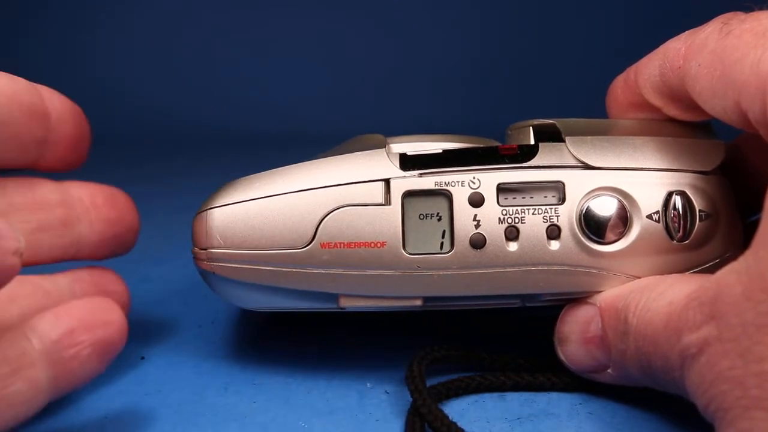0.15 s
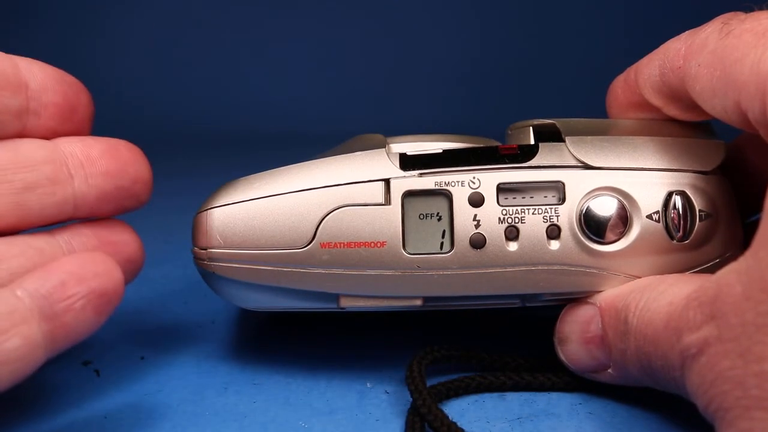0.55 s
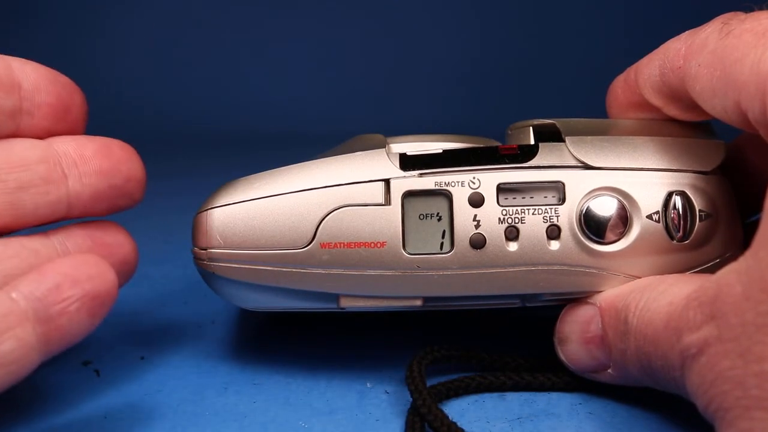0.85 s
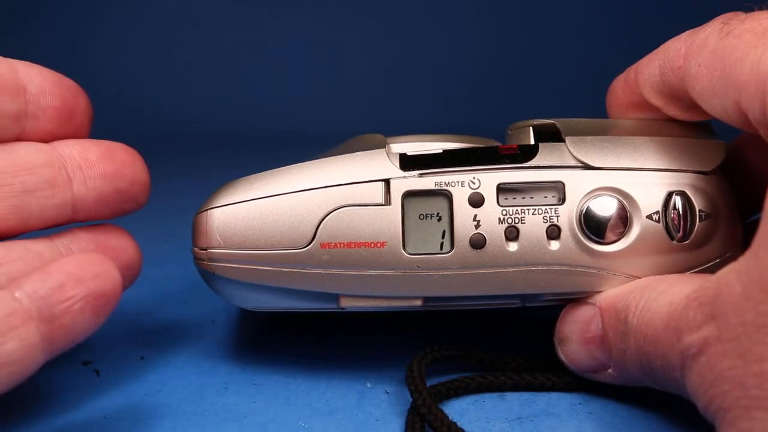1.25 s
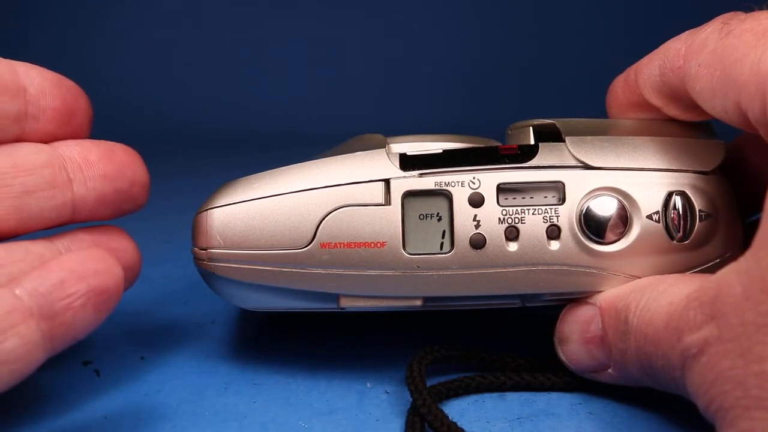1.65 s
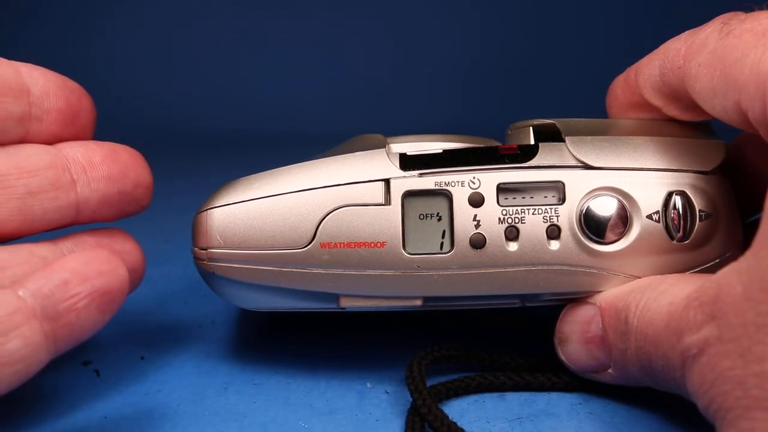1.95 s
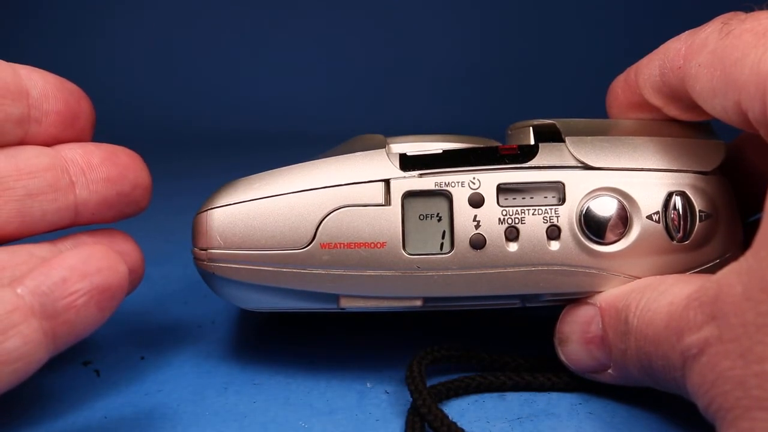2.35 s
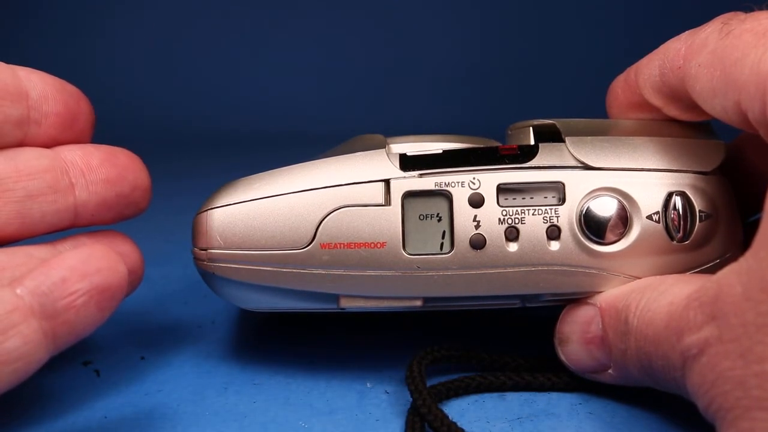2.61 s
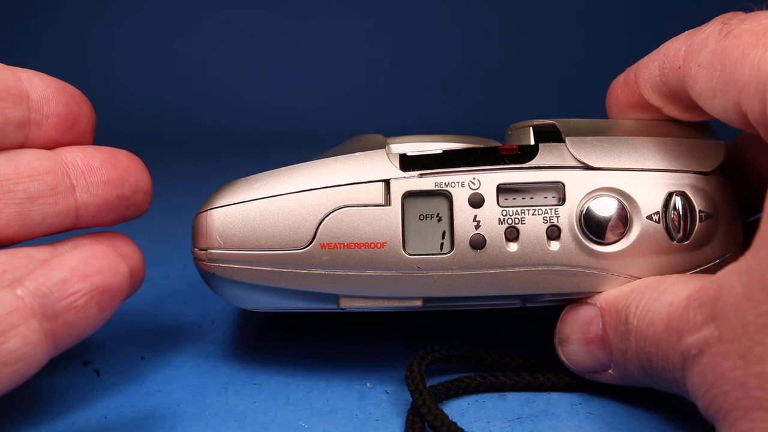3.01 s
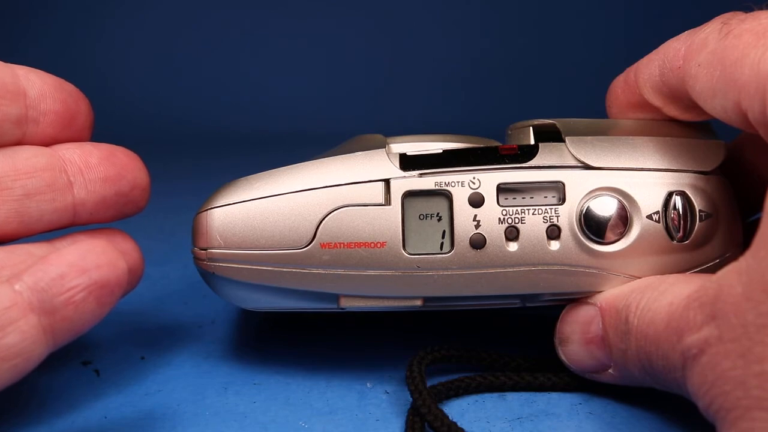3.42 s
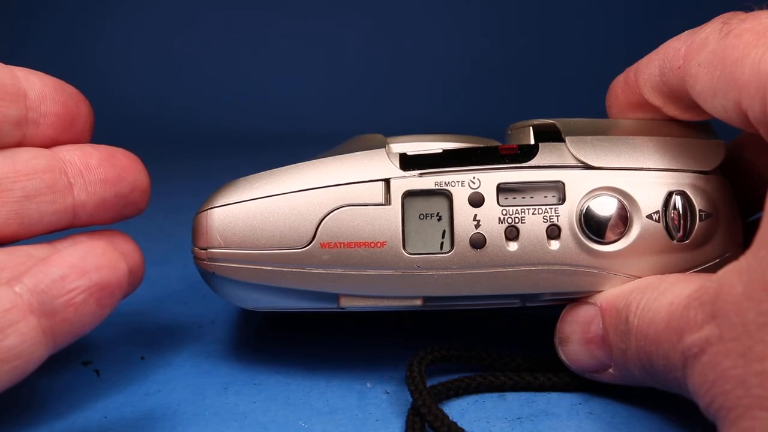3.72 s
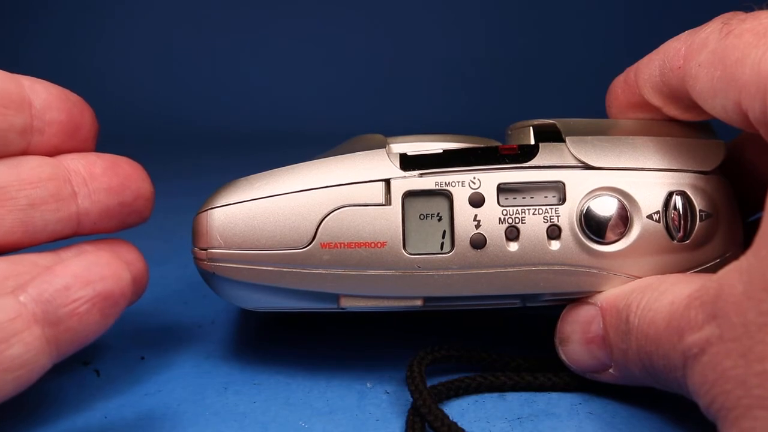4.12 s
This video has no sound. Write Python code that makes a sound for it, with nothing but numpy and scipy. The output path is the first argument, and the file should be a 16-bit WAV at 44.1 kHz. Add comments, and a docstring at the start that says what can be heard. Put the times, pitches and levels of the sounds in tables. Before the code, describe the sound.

Close, continuous electric whirring of a compact film camera rewinding, with a nasal whine, dry gear chatter and a faint click halfway through.

```python
"""Camera winding back its film

A small camera winds its film back, held close to a pair of microphones in a quiet room.
The three-pole motor is a sum of sines on its shaft orders, with the ten-tooth pinion's whine on the
mesh rate. The plastic gear train is noise and random tooth knocks coloured by the case, plus harder
knocks, a dull bump and one snap as ringing modes. A faint steady mains hum lies behind."""
import sys
import numpy as np
from scipy import signal
from scipy.fft import rfft, irfft, next_fast_len
from scipy.io import wavfile

SR = 44100
rng = np.random.default_rng(int(sys.argv[2]) if len(sys.argv) > 2 else 0)


def master_out(mix):
    """Clip the mix to full scale and print it as 16-bit PCM to the path in sys.argv[1]."""
    frames = np.transpose(np.atleast_2d(mix))
    ceiling = np.clip(frames, -1, 1)
    pcm = np.round(ceiling * 32767).astype(np.int16)
    wavfile.write(sys.argv[1], SR, pcm)


N = 188174  # samples
TEETH = 10  # on the pinion: tooth meshes per motor turn
WHEELS_TURN = 0.45  # turns of the first wheel per motor turn

# Song of the driven wheels. Each row: time in seconds, change of level in dB.
WHEELS_SONG = [(0, -8.5), (.3, -1.5), (.55, 5), (.85, 4), (1.05, 4.5), (1.3, -1), (1.5, -3), (1.75, -7),
               (2.0, -0.5), (2.45, 1), (2.65, -1), (2.85, -2), (3.1, 3.5), (3.35, 2.5), (3.5, -0.5),
               (3.6, -0.5), (3.78, 0), (3.95, 3), (4.05, -3.5), (4.27, -4.5)]


def from_db(db):
    """Decibels to gain."""
    return 10 ** (np.asarray(db) / 20)


def rms_one(x):
    """Scale to an RMS of 1."""
    return x / np.sqrt(np.mean(x ** 2) + 1e-20)


def in_time(rows):
    """Columns of a curve table, one value a sample."""
    s, *columns = np.transpose(rows)
    return [np.interp(np.arange(N) / SR, s, c) for c in columns]


def at_hz(rows, hz):
    """Columns of a frequency table, read on a log axis."""
    table_hz, *columns = np.transpose(rows)
    return [np.interp(np.log(hz), np.log(table_hz), c) for c in columns]


def drift(rate):
    """Slow chance, about rate changes a second, RMS 1: noise smoothed by two equal poles."""
    hop, settle = 20, 3000  # samples per slow step, slow steps dropped while the filter settles
    pole = np.exp(-2 * np.pi * rate * hop / SR)
    noise = rng.standard_normal(N // hop + settle + 2)
    slow = signal.lfilter([1], [1, -2 * pole, pole * pole], noise)[settle:]
    return np.interp(np.arange(N) / hop, np.arange(len(slow)), rms_one(slow))


def motor(turns, pole_db, sixth_db):
    """A sine on each shaft order; backlash blurs the high orders, driven wheels give side lines."""
    # Each row: multiple of the shaft speed, left RMS level in dB, right RMS level in dB, left's lead
    # in radians; levels stand before all swells. Fractional orders are the song of the driven wheels.
    shaft_orders = [(1, -53.5, -54.5, -.2), (2, -63, -60, -.2), (3, -45, -44.5, -.4),
                    (4, -55.5, -52.5, -.3), (5, -53, -51, -.2), (6, -49, -46.5, -.4), (7, -53, -52, -.2),
                    (8, -62, -60, -1.4), (9, -52, -52, -.7), (10, -42, -44, .5), (13, -63, -54, 1),
                    (14, -56, -57, 1.5), (15, -56, -55, -2.5), (18, -56, -50, 2.1), (20, -46.5, -44.5, -.5),
                    (21, -57, -46, -.7), (23, -59, -57, -.2), (30, -56, -50, .7), (40, -66, -63, 1.3),
                    (9.5, -54, -50, 0), (10.6, -56, -48, 0), (11.15, -56, -47, 0), (11.5, -56, -49, 0),
                    (10.33, -58, -51, 0), (11.77, -55, -51, 0), (12.2, -57, -53, 0), (13.8, -59, -53, 0),
                    (14.2, -59, -52, 0)]
    swells = {3: (pole_db, pole_db), 5: (sixth_db / 2, sixth_db / 2), 6: (sixth_db, sixth_db)}
    swells.update(whine_levels())
    wheels = 0.15 * np.cos(2 * np.pi * turns / 6) + 0.1 * np.cos(2 * np.pi * turns / 3)
    wheels = wheels + 0.15 * np.cos(2 * np.pi * WHEELS_TURN * turns)
    wheels_db, = in_time(WHEELS_SONG)
    backlash = 0.0032 * drift(41) + 0.004 * drift(14)  # turns
    out = np.zeros((2, N))
    for order, left_db, right_db, lead in shaft_orders:
        high = min(order / TEETH, 1)
        song_db = wheels_db * (order % 1 > 0)
        phase = 2 * np.pi * order * (turns + backlash) + rng.uniform(0, 2 * np.pi)
        # the flutter is widest at order 7
        flutter_db = np.interp(order, [3, 7, 20], [0.9, 3.6, 1.1]) * drift(22)
        # high orders leave the case by several paths, so the two sides wander apart
        apart = lead + 1.2 * high ** 4 * drift(10) / max(order / TEETH, 1)
        for side, level_db in enumerate([left_db, right_db]):
            swell_db = swells.get(order, (0, 0))[side]
            side_flutter_db = 1.2 * high * drift(11.3)
            gain = from_db(level_db + swell_db + song_db + flutter_db + side_flutter_db)
            gain *= 1 + np.sqrt(high) * wheels
            out[side] += np.sqrt(2) * gain * np.sin(phase + apart * (1 - side))
    return out


def whine_levels():
    """Level changes of the load-dependent orders on each side, as the load eases towards the film's end."""
    # Each row: shaft order, then changes in dB: loaded left, loaded right, eased left, eased right,
    # swell left, swell right.
    load_orders = [(4, -.5, -.5, -6, -7, 0, 0), (8, 0, 0, 11, 7, 0, 0), (10, 1.5, -3, -9, 10, -2, 3),
                   (14, -3, -2, 1, 5, 1, -2), (18, -1, 1, 7, -16, 2, -2), (20, 1.5, -1.5, -3, -4, -.5, 5.5),
                   (21, 2, -0.5, 2, -9, 0, 2), (30, 0, 2, -12, -13, -2, 0)]
    # Whine on twice the mesh rate. Each row: time in seconds, level in dB (only its shape is used).
    whine = [(0.0, -69), (0.02, -46), (0.28, -42), (0.36, -49), (0.38, -42), (0.45, -51), (0.55, -40),
             (0.61, -51), (0.69, -40.5), (0.82, -47), (0.94, -43.5), (1.39, -45), (1.42, -45), (1.48, -48),
             (1.64, -41.5), (1.7, -46), (2.01, -39.5), (2.02, -38.5), (2.24, -47.5), (2.28, -40.5),
             (2.4, -43.5), (2.58, -41.5), (2.73, -51), (2.83, -40), (2.86, -48.5), (2.99, -40.5),
             (3.52, -40.5), (3.56, -48), (3.69, -39.5), (3.79, -48), (3.99, -40), (4.06, -53), (4.24, -56),
             (4.27, -51)]
    t = np.arange(N) / SR
    # the easing is still under way when the sound ends
    eased = np.interp(t, [2.96, 5.5], [0, 1])
    # one swell as the load starts to ease: start, attack, hold, release in seconds
    swell = np.interp(t, np.cumsum([2.9, 0.25, 0.4, 0.2]), [0, 1, 1, 0])
    wander_spread_db, wander_per_s = 1.0, 5
    levels = {}
    for order, *db in load_orders:
        loaded_db, eased_db, swell_db = np.reshape(db, (3, 2, 1))
        wander_db = wander_spread_db * np.array([drift(wander_per_s), drift(wander_per_s)])
        load_db = loaded_db * (1 - eased) + eased_db * eased
        levels[round(order)] = load_db + swell_db * swell + wander_db
    whine_db, = in_time(whine)
    line_per_band = 1.2  # dB of the line per dB of its band
    levels[2 * TEETH] = levels[2 * TEETH] + line_per_band * (whine_db - whine_db.mean())
    return levels


def case_paths(near, far, hz):
    """Spectra at both sides of the loosely held case, and the change in dB that a firm grip brings."""
    # Case colour before the shell. Each row: frequency in Hz, left and right density in dB per Hz.
    case = [(30, -91, -99), (70, -84.5, -82.5), (344, -88, -82.5), (570, -82.5, -83), (816, -83.5, -81.5),
            (1200, -74.5, -68), (1555, -75.5, -69), (2010, -74, -64), (3490, -73, -70), (4870, -78, -75.5),
            (6740, -84, -76), (7450, -85.5, -88), (10000, -86, -89.5), (14800, -91, -90), (17400, -99, -99)]
    # Shell resonances and dips. Each row: centre in Hz, width in Hz, left change in dB,
    # right change in dB, further change under a firm grip in dB.
    shell = [(640, 240, 8.5, 11, 0), (1467, 150, 8, -2.5, 1.5), (2500, 500, -9, 2.5, -0.5),
             (1170, 110, -3, -5, -1), (1770, 170, -1, -4, 0), (2380, 260, 2, 1, 1), (2560, 200, 2, -1, 0),
             (2780, 120, 0, -3, 0), (3950, 250, 3, -1, -1), (2900, 330, -2, 0.5, 5), (3630, 720, 1, 2, -5),
             (4170, 520, -2.5, 5, 2.5), (4600, 200, 0, -3, -2), (5395, 270, 7.5, 4, -3),
             (5700, 250, 1, 3.5, -5.5), (6190, 200, 9.5, 6, -10.5), (6480, 240, 1.5, -12.5, 5),
             (6850, 840, -0.5, 2.5, 4), (8350, 440, 1.5, 5.5, 0), (10960, 590, -21, 5.5, 2.5),
             (11750, 1250, 5, 0, 2.5)]
    # The two paths out. Each row: frequency in Hz, likeness of the sides 0-1, left's lead in radians.
    paths = [(60, .5, 0), (330, .75, -.2), (600, .93, -.3), (1400, .85, -.3), (1900, .35, -1),
             (2400, .55, 0), (2900, .5, 1.5), (3500, .5, .3), (4000, .2, 1), (5300, .6, -.9),
             (6100, .15, 1), (6900, .6, 1.1), (8000, .2, 1), (10500, .35, 2.3), (14000, .45, 3.1)]
    left_db, right_db = at_hz(case, hz)
    alike, lead = at_hz(paths, hz)
    firm_db = 0
    for centre_hz, width_hz, left_peak_db, right_peak_db, change_db in shell:
        peak = 1 / (1 + (2 * (hz - centre_hz) / width_hz) ** 2)
        left_db = left_db + left_peak_db * peak
        right_db = right_db + right_peak_db * peak
        firm_db = firm_db + change_db * peak
    left = from_db(left_db) * near
    right = from_db(right_db) * (alike * np.exp(-1j * lead) * near + np.sqrt(1 - alike ** 2) * far)
    # noise of RMS 1 spreads its power over SR / 2 Hz
    return np.sqrt(SR / 2) * np.array([left, right]), firm_db


def rattle(turns, load_db, firmness, patchy_db, knock_share):
    """Tooth knocks of random strength and sliding noise, coloured by the case on the way to each side."""
    contact = np.diff(np.floor(turns * TEETH), prepend=0) > 0
    knocks = rms_one(contact * rng.standard_normal((2, N)))
    sliding = rng.standard_normal((2, N))
    source = np.sqrt(knock_share) * knocks + np.sqrt(1 - knock_share) * sliding
    # the armature is out of round: the rattle throbs once and three times a turn, and with the first wheel
    throb = 0.07 * np.cos(2 * np.pi * turns) + 0.078 * np.cos(6 * np.pi * turns)
    throb = throb + 0.02 * np.cos(2 * np.pi * WHEELS_TURN * turns)
    size = next_fast_len(N)
    hz = np.maximum(np.fft.rfftfreq(size, 1 / SR), 1)
    near, far = rfft(source * (1 + throb), size)
    loose, firm_db = case_paths(near, far, hz)
    loose_sound = irfft(loose, size)[:, :N]
    firm_sound = irfft(loose * from_db(firm_db), size)[:, :N]
    held = rfft(loose_sound * (1 - firmness) + firm_sound * firmness, size)

    octaves = np.log2(np.maximum(hz, 256))
    out, together = np.zeros((2, N)), drift(47)
    for octave in np.arange(8, 14.6, 0.5):  # log2 of Hz
        # half-octave bands chatter partly together, partly alone; the lowest band does not chatter
        band = np.clip(1 - 2 * np.abs(octaves - octave), 0, 1)
        geared = np.clip((octave - 8) / 2, 0, 1)
        # load is felt most near the mesh rate
        loaded = np.exp(-((octave - 11.3) / 1.1) ** 2)
        chatter_db = patchy_db * (0.15 * together + drift(90) + 0.7 * drift(4))
        out += irfft(held * band, size)[:, :N] * from_db(geared * chatter_db + loaded * load_db)
    return out


def struck(hits, modes, left_db):
    """Each hit sets short modes ringing, each with a strength of its own, neighbours in opposite sense."""
    out = np.zeros((2, N))
    s, hit_db = np.transpose(hits)
    for k, (hz, level_db, t60) in enumerate(modes):
        strength_db = hit_db + level_db + rng.normal(0, 1.5, len(s))
        clicks = np.zeros(N) + 1e-18
        clicks[(s * SR).astype(int)] = from_db(strength_db) * (-1) ** k
        # a two-pole resonator that falls 60 dB in t60
        r, w = from_db(-60 / (t60 * SR)), 2 * np.pi * hz / SR
        out += signal.lfilter([0, np.sin(w)], [1, -2 * r * np.cos(w), r * r], clicks)
    # parts this small radiate no bass
    out = signal.sosfilt(signal.butter(2, 600, "high", fs=SR, output="sos"), out)
    return out * from_db([[left_db], [0]])


def tooth_knocks():
    """Harder tooth knocks, among them the snap's duller later bounces near 2.0 s, and softer chance ones,
    ringing the same gearbox modes."""
    # Each row: time in seconds, strength in dB before the mode levels.
    hard_knocks = [(.6479, -23), (.8374, -21), (.8545, -23), (.8904, -23), (1.0705, -23), (1.8372, -19),
                   (1.9986, -16), (2.002, -24), (2.0996, -23), (2.930, -22), (3.0972, -22), (3.255, -24),
                   (3.3475, -22), (3.366, -21), (3.3868, -22), (3.4171, -22), (3.4325, -23), (3.4715, -23),
                   (3.485, -22), (3.5049, -24), (3.6785, -23), (3.9362, -23)]
    # Each row: mode frequency in Hz, level in dB, 60 dB decay time in seconds.
    gearbox = [(2100, -7, .012), (2350, -3, .014), (1450, -10, .012), (800, -22, .015), (2800, -7, .008)]
    return struck(hard_knocks, gearbox, left_db=-6.0) + struck(clatter(), gearbox, left_db=-6.0)


def clatter():
    """Rows (seconds, strength in dB) of chance knocks, crowded where the driven wheels are loud."""
    per_s, base_db, spread_db = 45, -29, 2.5  # mean rate, base strength, scale of the log spread
    busy = np.cumsum(from_db(in_time(WHEELS_SONG)[0]))
    place, chance = rng.random((2, int(per_s * N / SR)))
    s = np.interp(place, busy / busy[-1], np.arange(N) / SR)
    return np.transpose([s, base_db - spread_db * np.log(chance + 0.02)])


def snap():
    """Something inside snaps once and bounces, ringing short bright modes."""
    # Snap and bounces. Each row: time in seconds, strength in dB before the mode levels.
    snaps = [(1.9968, -13.5), (1.9976, -20), (1.9983, -19), (2.0004, -32)]
    # Each row: mode frequency in Hz, level in dB, 60 dB decay time in seconds.
    latch = [(1300, -20, .012), (2700, -6, .009), (3300, -3, .008), (3900, -4, .007), (4600, -9, .007),
             (5600, -10, .005), (6600, -8, .005), (8200, -15, .009), (9300, -18, .007), (10800, -21, .006),
             (12600, -26, .006)]
    return struck(snaps, latch, left_db=-3.5)


def dull_bump():
    """A dull bump inside the case, ringing its lower, longer modes."""
    # Each row: time in seconds, strength in dB before the mode levels.
    bumps = [(3.1562, -25), (3.1585, -27)]
    # Each row: mode frequency in Hz, level in dB, 60 dB decay time in seconds.
    hollow = [(750, -9, .025), (1100, -8, .018), (1400, -8, .014), (1850, -3, .014)]
    return struck(bumps, hollow, left_db=-2.0)


def mains_hum():
    """A faint mains hum, one sine of slowly wandering level, equal at both microphones."""
    hum_hz, rms_db = 118, -70.5
    gain = from_db(rms_db + 1.9 * drift(1.6))
    return gain * np.sqrt(2) * np.sin(2 * np.pi * hum_hz * np.arange(N) / SR)


def scene():
    """Motor, gear train, knocks, snap and bump leaning slightly left, over a faint mains hum."""
    # Motor speed. Each row: time in seconds, turns per second.
    motor_speed = [(0.0, 207.5), (0.05, 207.8), (0.2, 205.6), (0.25, 201.8), (0.28, 203.8), (0.31, 207.9),
                   (0.53, 209.3), (0.73, 207.0), (0.75, 208.5), (0.91, 205.9), (0.94, 199.7), (0.98, 205.5),
                   (1.09, 205.5), (1.12, 203.6), (1.21, 207.4), (1.54, 208.1), (1.67, 206.2), (1.72, 208.8),
                   (1.99, 206.8), (2.01, 208.9), (2.05, 206.7), (2.2, 208.4), (2.34, 206.3), (2.41, 207.7),
                   (2.63, 206.3), (2.65, 207.5), (2.71, 203.9), (2.74, 206.9), (2.76, 209.2), (2.84, 207.1),
                   (2.94, 211.1), (3.0, 208.3), (3.26, 207.5), (3.33, 210.1), (3.43, 209.2), (3.45, 207.5),
                   (3.59, 212.8), (3.68, 211.9), (3.7, 210.2), (3.83, 214.4), (3.98, 211.3), (4.15, 217.5),
                   (4.17, 214.7), (4.23, 216.1)]
    # Pole hum. Each row: time in seconds, change of the third order in dB, of the sixth order in dB.
    pole_hum = [(0, -1, 2), (.65, 0.75, 0), (1.0, -0.5, -1.5), (1.3, 0, 1), (2.8, 0.1, 1), (2.94, -3, 2.5),
                (3.05, 0, -1), (3.35, 2.5, -4), (3.75, -3, 0), (4.07, -3, -2), (4.16, 5, 7),
                (4.27, -0.5, -5)]
    # Rattle near the mesh rate. Each row: time in seconds, change of level in dB.
    rattle_level = [(0, 0), (.45, 0), (.7, 0), (1.05, 0.5), (1.45, 0), (1.78, -0.5), (1.83, 0.9),
                    (2.4, 0.9), (2.66, 0.5), (2.9, 0.1), (3.05, 2.5), (3.2, -0.5), (3.35, 1), (3.6, -1),
                    (3.68, 3.5), (3.77, -2), (3.85, 1), (4.07, -0.5), (4.27, -0.2)]
    # Grip on the case. Each row: time in seconds, firmness 0-1.
    grip = [(0, 0.5), (.5, 0), (1.0, 0), (1.4, 0.2), (2.1, 0.17), (3.0, 0.3), (3.6, 0.68), (4.27, .98)]
    (speed,), (load_db,), (firmness,) = in_time(motor_speed), in_time(rattle_level), in_time(grip)
    turns = np.cumsum(speed) / SR
    pole_db, sixth_db = in_time(pole_hum)
    # the sixth order fades when the motor is dragged below its usual turns per second
    usual_speed, sag_db_per_turn = 207, 1
    sag_db = sag_db_per_turn * np.minimum(speed - usual_speed, 0)
    camera = motor(turns, pole_db, sixth_db + sag_db)
    camera += rattle(turns, load_db, firmness, patchy_db=1.47, knock_share=0.09)
    camera += tooth_knocks() + snap() + dull_bump()
    lean_db = 0.5  # left over right
    return camera * from_db([[lean_db / 2], [-lean_db / 2]]) + mains_hum()


def record(dry):
    """The top is cut steeply, 60 dB down from 15.9 kHz up."""
    return signal.sosfilt(signal.cheby2(16, 60, 15900, fs=SR, output="sos"), dry)


dry = scene()
out = record(dry)
master_out(out)
```